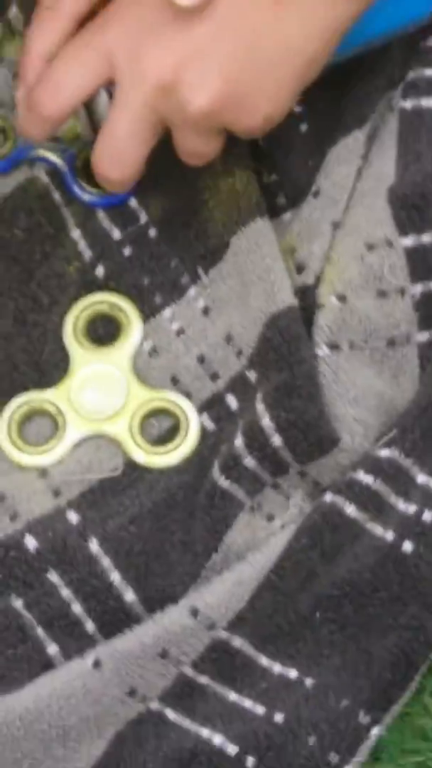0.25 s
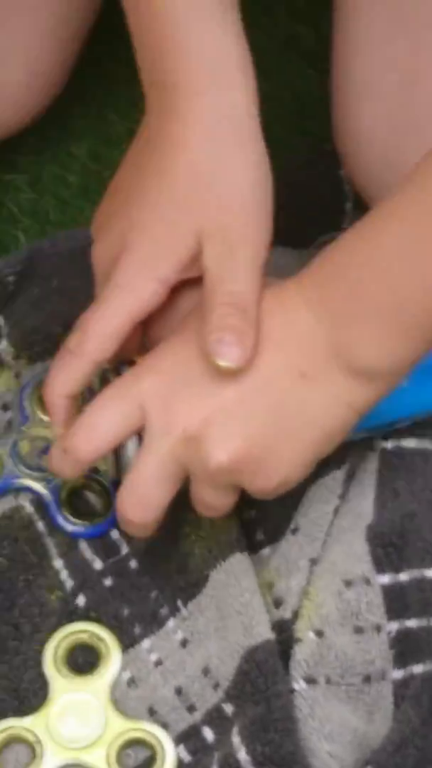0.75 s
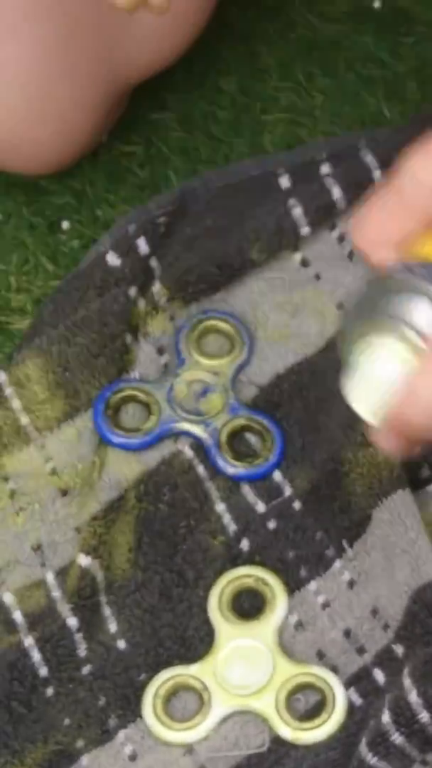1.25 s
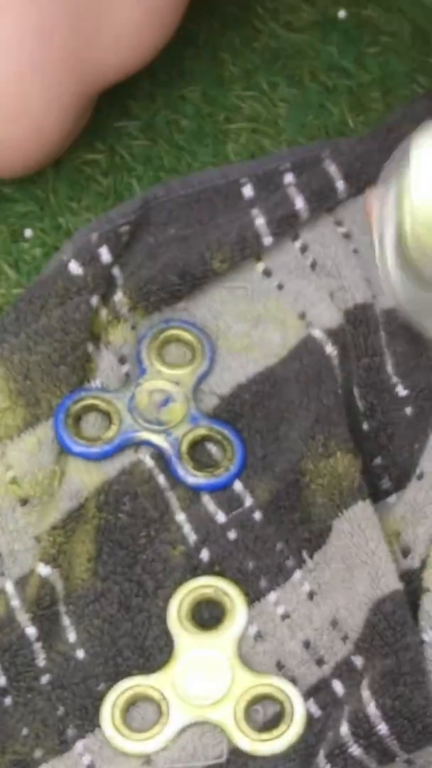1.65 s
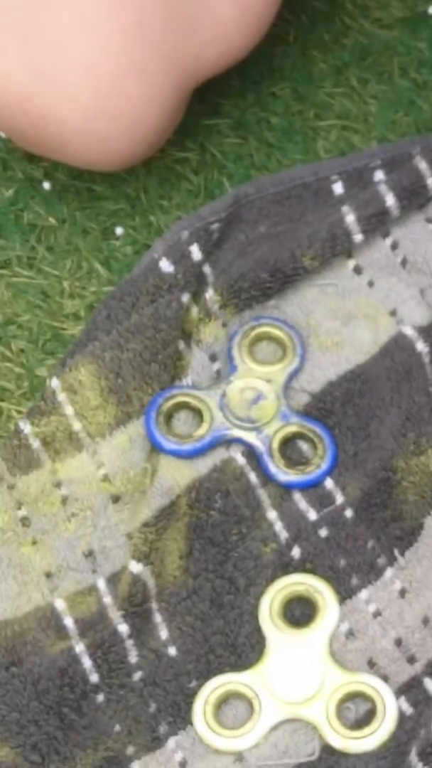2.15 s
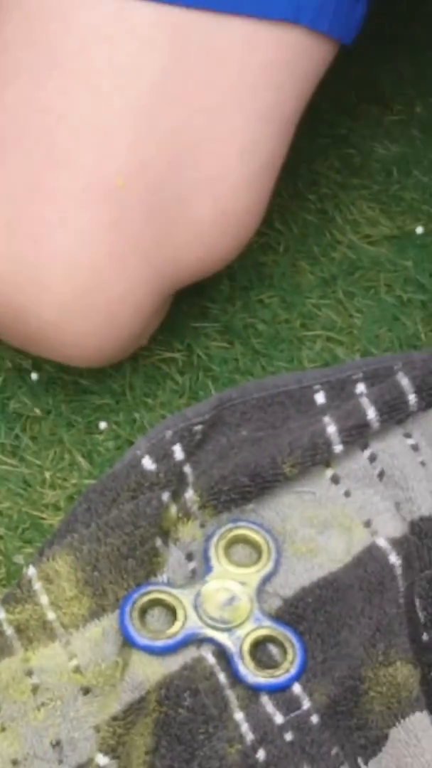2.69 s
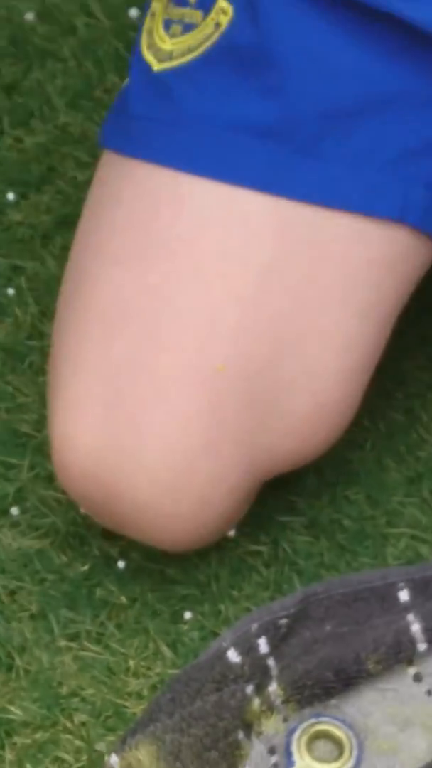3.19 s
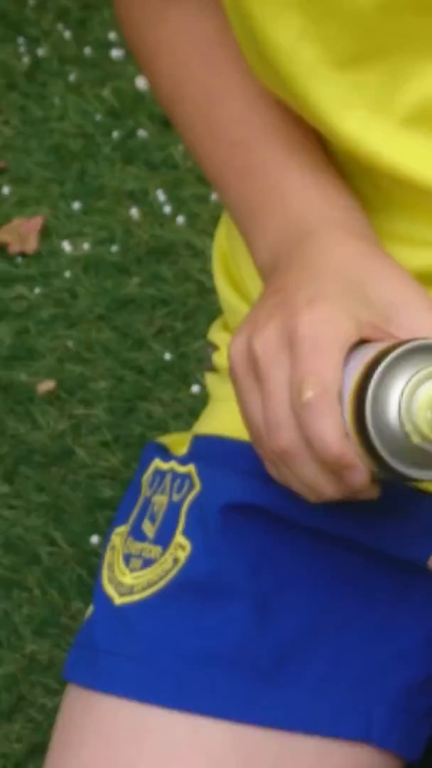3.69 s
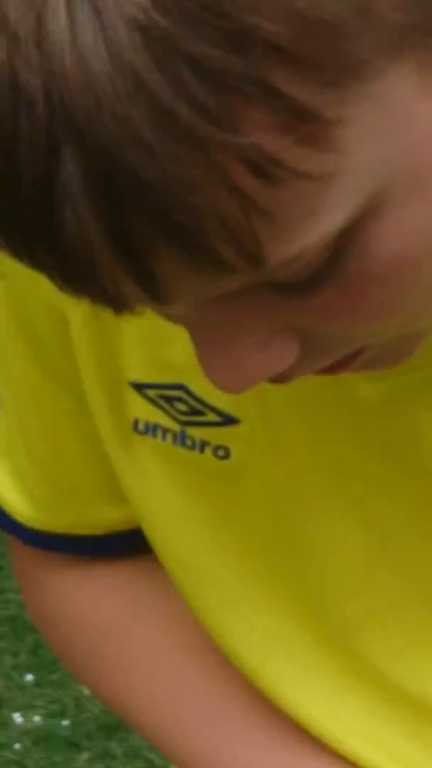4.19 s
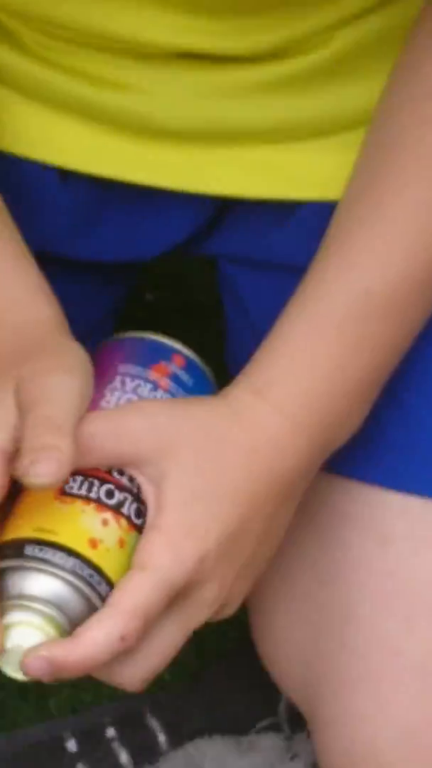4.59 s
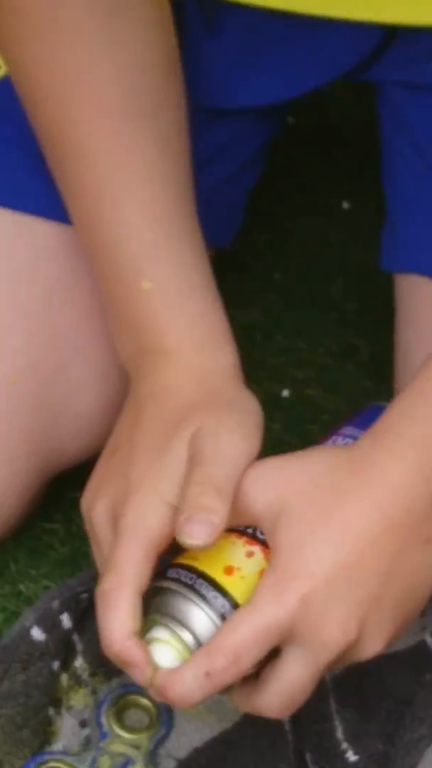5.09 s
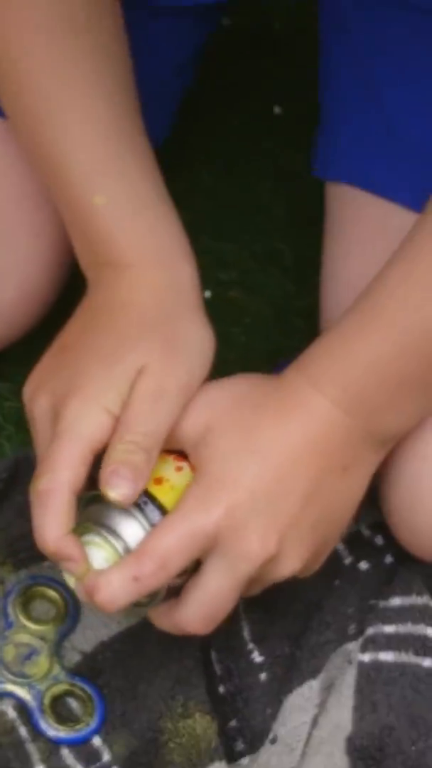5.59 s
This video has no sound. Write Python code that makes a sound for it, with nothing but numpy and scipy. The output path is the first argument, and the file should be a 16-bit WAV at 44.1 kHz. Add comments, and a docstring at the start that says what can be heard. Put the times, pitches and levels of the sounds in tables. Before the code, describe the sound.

Outdoors on a lawn, a small clink or two and faint hand rustle precede a burst of vigorous spray-can shaking. The ball makes dense, bright, irregular metal clinks with low air thumps for about two and a half seconds. Stray ticks follow, then far traffic, weak bird chirps and a very faint nozzle hiss. The close stereo handheld microphone adds slight hiss.

```python
"""Shaking a paint can

A steel paint can is shaken on a lawn: its mixing ball strikes the domed ends and the wall, bounces and rolls.
The hand-damped shell answers each blow with short clinks (fading sine waves) and a dense ring (fading noise).
Far traffic drones as wavering low tones over a noise wash, and birds chirp far off as gliding tones.
Pushed air bumps the microphone as low, filtered noise and pulses. Hands rustle on the can and at the end
the nozzle hisses faintly: both are shaped noise, as is the faint steady hiss of the microphone."""
import sys
import numpy as np
from scipy import signal
from scipy.fft import rfft, irfft, next_fast_len
from scipy.io import wavfile
from scipy.ndimage import uniform_filter1d, map_coordinates

SR = 44100
rng = np.random.default_rng(int(sys.argv[2]) if len(sys.argv) > 2 else 0)


def generate_wav(sig):
    """Save sig (samples, or channels by samples) to the path in sys.argv[1] as 16-bit PCM at SR."""
    pcm = np.round(np.clip(np.atleast_2d(sig).T, -1, 1) * 32767).astype(np.int16)
    wavfile.write(sys.argv[1], SR, pcm)


N = 257673  # length in samples


def amp(db):
    """Turn a level in dB into a gain."""
    return 10 ** (np.asarray(db) / 20)


def unit(x):
    """Scale to an average (rms) strength of 1."""
    return x / np.sqrt(np.mean(x ** 2) + 1e-20)


def peak(x):
    """Scale so the largest swing is 1."""
    return x / np.abs(x).max()


def along(points, hz):
    """Read a curve of (f/Hz, value) points on a log frequency axis."""
    f, v = np.transpose(points)
    return np.interp(np.log(hz + 1), np.log(f + 1), v)


def curves(rows):
    """Give one value per sample for each column after the time."""
    s, *cols = np.transpose(rows)
    return [np.interp(np.arange(N) / SR, s, c) for c in cols]


def during(rows, fade=0.016):
    """1 inside the time span of a table, fading to 0 outside it over `fade` seconds."""
    t = np.arange(N) / SR
    inside = np.minimum(t - rows[0][0], rows[-1][0] - t)
    return np.clip(inside / fade + 1, 0, 1)


def wobble(rate):
    """A smooth random curve with `rate` random points a second."""
    knots = rng.standard_normal(int(N * rate / SR) + 4)
    return map_coordinates(knots, [np.arange(N) * rate / SR])


def filtered(x, response):
    """Multiply the spectrum of x by a response that depends on frequency."""
    m = next_fast_len(N + SR // 2)
    hz = np.fft.rfftfreq(m, 1 / SR)
    return irfft(rfft(x, m) * response(hz), m)[..., :N]


def band(f, centre_hz, width_hz):
    """A resonance that lets its centre through at gain 1."""
    return 1j * f * width_hz / (centre_hz ** 2 - f * f + 1j * f * width_hz)


def rush(spectrum, alike, patchy_db):
    """Stereo noise of rms 1, patchy in time and pitch, with a set left-right likeness."""
    z = signal.stft(rng.standard_normal((2, N + 512)), nperseg=512)[2]
    field = rng.standard_normal(z.shape[1:])
    field = uniform_filter1d(field, size=6, axis=0)
    field = uniform_filter1d(field, size=12, axis=1)
    pair = signal.istft(z * amp(patchy_db * unit(field)), nperseg=512)[1][:, :N]

    def mid_and_side(hz):
        """Shape the noise and share it between what the sides have in common and what differs."""
        turn = np.arccos(np.clip(along(alike, hz), -1, 1)) / 2
        return amp(along(spectrum, hz)) * [np.cos(turn), np.sin(turn)]

    mid, side = filtered(pair, mid_and_side)
    return unit(np.array([mid + side, mid - side]))


# Idling engine: t/s, f/Hz before the wobble, relative level/dB, relative level of the octave/dB
IDLING = [(0.0, 50, -84, -76), (0.18, 54.3, -61, -92), (0.42, 49.9, -64, -80), (0.58, 54.9, -62, -66),
          (1.06, 55.13, -58.5, -82), (2.99, 52.8, -65.5, -65.5), (3.48, 54.16, -52.5, -76.5),
          (4.13, 57.06, -69, -72), (4.49, 57.4, -59.5, -73), (4.6, 49.8, -58, -69), (5.74, 52, -45, -59),
          (5.84, 54.5, -49.5, -61)]


def idling_engine():
    """A far engine drones as a wavering low tone and its octave."""
    hz, db, octave_db = curves(IDLING)
    turn = 2 * np.pi * np.cumsum(hz + 0.587 * wobble(10)) / SR
    low = amp(db + 1.2 * wobble(7)) * np.sin(turn)
    octave = amp(octave_db + 0.83 * wobble(4.8)) * np.sin(2 * turn)
    return np.sqrt(2) * (low + octave) * amp([[-4], [3]])  # left, right


# Strength of the road wash over time: t/s, relative level/dB
ROAD_LEVEL = [(0.0, -63.5), (1.89, -65), (5.84, -57)]
# Tone colour of the road wash: f/Hz, relative level per Hz/dB
ROAD_COLOUR = [(18, -32.5), (30, -21.5), (56, -14), (224, -27), (470, -22.5), (579, -26), (687, -23.5),
               (756, -24), (2800, -40), (3640, -83), (6160, -120)]
# How much left and right share the same wash: f/Hz, likeness [0 to 1]
ROAD_ALIKE = [(60, 0.62), (240, 0.66), (950, 0.41), (3770, 0.13), (15000, 0.16)]


def road_wash():
    """The far road is noise, strongest in the bass, whose level wavers slowly."""
    level = amp(curves(ROAD_LEVEL)[0] + 1.5 + 0.41 * wobble(5.3))
    return level * rush(ROAD_COLOUR, ROAD_ALIKE, patchy_db=1.5) * amp([[-1.5], [1.5]])


# Tone colour of the microphone's own hiss: f/Hz, relative level per Hz/dB
HISS_COLOUR = [(880, -33), (1500, -17), (2390, -27), (2970, -22.5), (3180, -16.5), (16000, -35.5)]


def mic_hiss():
    """The microphone's own faint steady hiss is soft, patchy noise."""
    return amp(-69) * rush(HISS_COLOUR, [(5000, 0.072)], patchy_db=4.5)


# Blows of the ball: t/s, relative clink level/dB, wall against ends level/dB before fixed lifts, clink centre f/Hz
BALL_BLOWS = [(0.0822, -19.5, -11, 6650), (0.1113, -39.5, 6, 6550), (0.1453, -37.5, 0, 7000),
              (0.2204, -35, -7, 6650), (1.112, -20, -1.5, 8070), (1.1472, -29, 4, 6870),
              (1.1959, -1.5, -20.5, 5810), (1.1987, -9, -36.5, 5920), (1.2172, -20.5, -24, 6300),
              (1.2367, -10.5, -27, 5900), (1.2491, -20.5, 1.5, 7150), (1.2561, -19.5, 3.5, 7370),
              (1.3212, -22.5, -4, 6725), (1.3345, -23.5, 1, 7500), (1.3943, -31, 6.5, 7400),
              (1.4345, -22, 3.5, 7950), (1.4663, -20.5, -9.5, 7540), (1.4754, -24, -6, 7160),
              (1.5033, -33.5, 0.5, 5340), (1.5292, -18.5, -13, 7430), (1.5421, -15.5, -8, 7630),
              (1.59, -14, 1.5, 7530), (1.6007, -3, -22, 7143), (1.6103, -7, -13, 6210),
              (1.6157, -5, -20.5, 7550), (1.6244, -9, -13.5, 7390), (1.6701, -9.5, -2.5, 5576),
              (1.6876, -18, -5, 7340), (1.7055, -19, -9.5, 7210), (1.7393, -26, 3.5, 6230),
              (1.7675, -4.5, -11, 7475), (1.8733, -21.5, -5, 6403), (1.8935, -16, -9, 7440),
              (1.973, -25, -11, 7160), (2.029, -36, -2.5, 7100), (2.0859, -18.5, -4, 5220),
              (2.3569, -22, 4.5, 5300), (2.3672, -20.5, -3, 5015), (2.3896, -24.5, 0, 7230),
              (2.3993, -22, -7.5, 6480), (2.443, -5, -25.5, 6216), (2.4473, -10, -26, 6460),
              (2.453, -10, -7.5, 6490), (2.4611, -10.5, -41.5, 6110), (2.5322, -5.5, -22.5, 6360),
              (2.546, -9, -20, 5910), (2.6357, -5.5, -18, 7170), (2.6455, -16, -18.5, 6500),
              (2.6559, -6.5, -21.5, 6515), (2.6659, -14.5, -20, 6500), (2.6787, -18, -26.5, 5500),
              (2.7111, -24, -1.5, 7100), (2.7295, -14, -34.5, 5940), (2.7552, -14, -34.5, 5760),
              (2.7699, -20.5, 1, 6375), (2.7803, -14, -5.5, 7350), (2.8736, -21.5, 5, 5930),
              (2.9048, -0.5, -35.5, 6480), (2.9156, -6.5, -15.5, 6290), (2.932, -10.5, -27, 5860),
              (2.9504, -12, -8.5, 5700), (2.9896, -15.5, -4, 5700), (3.0862, -33.5, 6, 5320),
              (3.1006, -19.5, 1, 5810), (3.1402, -4, -13, 5990), (3.151, -12.5, -6.5, 6150),
              (3.1829, -20, 2.5, 6100), (3.1893, -9.5, -12.5, 5930), (3.2211, -9, -18.5, 6180),
              (3.2992, -24.5, -6.5, 6150), (3.3402, -2.5, -25, 5590), (3.3609, -4, -21.5, 5670),
              (3.397, -11, -12.5, 7330), (3.4035, -6, -18, 5690), (3.4146, -9, -10, 6220),
              (3.4888, -16, -13, 6240), (3.5453, -4, -20, 6040), (3.5575, -11, -18.5, 5880),
              (3.5618, -7, -23, 5800), (3.5686, -10.5, -24, 5500), (3.5997, -20, -1.5, 6785),
              (3.616, -9.5, -31, 6060), (3.6241, -6, -25, 5840), (3.6681, -10.5, -3.5, 5650),
              (3.677, -19.5, 3.5, 6100), (3.7161, -15.5, 4.5, 6120), (3.7806, -32.5, -4, 6270),
              (3.9062, -33.5, 4.5, 6630), (4.0366, -20.5, 3.5, 5380), (4.081, -27, -7.5, 5900),
              (4.1104, -37, 10, 7120), (4.3891, -28, 1.5, 5600), (4.4351, -31, -0.5, 7220),
              (4.4583, -33.5, -2, 7640), (4.5101, -42, 0.5, 5230), (4.5636, -44, 2.5, 6640),
              (4.6156, -34.5, -5, 7400), (4.6486, -44, 3.5, 6510), (4.714, -55.5, 7, 6200),
              (5.275, -54, 10, 5770)]
# Ways the can rings, before random changes; the lowest four bend the wall, the others ring the ends:
# f/Hz, relative level/dB, time to fall by 60 dB t/s
CAN_MODES = [(1500, -9, .015), (2270, -1, .025), (2430, -1, .02), (2900, -9, .015), (3650, -16, .015),
             (4300, -14, .015), (5100, -2, .01), (5350, 0, .014), (5750, 0, .011), (6020, 0, .013),
             (6350, 0, .011), (6800, 0, .01), (7350, 0, .012), (7850, 0, .013), (8600, -6, .01),
             (9400, -8, .01), (11300, -12, .008)]
# Pitch of the wall, moving with the grip and the paint inside, before random detuning: t/s, f/Hz
WALL_PITCH = [(.1, 2364), (1.25, 2216), (1.32, 2475), (1.44, 2314), (1.75, 2400), (2.36, 2482), (2.6, 2240),
              (2.71, 2440), (2.87, 1980), (3.02, 2100), (3.14, 2400), (3.19, 1950), (3.42, 2183),
              (3.6, 2460), (3.67, 2270), (3.8, 2560), (4.44, 2603), (4.65, 2350)]
# Where the can is: t/s, left lead [samples], left minus right level/dB
CAN_PLACE = [(0, 1.4, -5), (1.1, 6.4, 0.5), (1.55, 3, -3), (2, 9.95, -3), (2.4, 15.9, 0), (3, 13.55, 1),
             (3.6, 9, -3), (4.1, 4.8, -3.5), (4.7, 1.27, -3)]
# Tone colour of the crack at contact: f/Hz, relative level per Hz/dB
CRACK_COLOUR = [(100, -65.5), (400, -30), (3000, -4), (6000, 4), (9000, -0.5), (12000, -6), (16000, -14)]


def blows(reach_hz=350, turn=1.206):
    """Each blow rings the end modes near its centre hardest; the two ports face different patches of the shell."""
    ring, crack, knock = np.zeros((3, 2, N + SR))
    t = np.arange(SR // 12) / SR
    hz, mode_db, t60 = np.transpose(CAN_MODES)[:, :, None]
    walls, usual_wall_hz = 4, 2350  # number of wall modes; wall pitch at which their table values hold
    wall = np.arange(len(CAN_MODES))[:, None] < walls
    lead, pan_db = curves(CAN_PLACE)
    for s, db, wall_db, centre_hz in BALL_BLOWS:
        wall_hz = np.interp(s, *np.transpose(WALL_PITCH))
        luck = rng.standard_normal((5, len(CAN_MODES), 1))
        noise = rng.standard_normal((2, len(t)))
        rebound = rng.random((2, 3))
        late_s = np.cumsum(0.0011 + 0.0033 * rebound[0])
        weaker_db = np.cumsum(7 + 8 * rebound[1])

        off_db = np.maximum(-4 * ((hz - centre_hz) / reach_hz) ** 2, -15)
        level = mode_db + np.where(wall, 0, off_db) + 3.0 * luck[0]
        # grip and paint detune the shell
        pitch = hz * np.where(wall, wall_hz / usual_wall_hz, 1) * (1 + 0.015 * luck[1])
        for side, sign in enumerate((1, -1)):  # left, right
            at = round(s * SR - sign * lead[round(s * SR)] / 2)
            gain = amp(db + sign * pan_db[at] / 2)
            fall = amp(level + 3.7 * luck[2 + side] - 60 * t / t60)
            tones = fall * np.sin(2 * np.pi * pitch * t + sign * turn * luck[4])
            tones = tones * (1 - np.exp(-t / 0.00026))  # soften the very first instant
            ends_part = amp(1.0) * peak(tones[walls:].sum(axis=0))
            wall_part = amp(wall_db - 1.5) * peak(tones[:walls].sum(axis=0))
            clink = gain * (ends_part + wall_part)
            ring[side, at:at + len(t)] += clink
            for late, weak in zip(late_s, weaker_db):  # the ball chatters before it leaves
                ring[side, at + int(late * SR):][:len(t)] += amp(-weak) * clink
            crack[side, at:at + len(t)] += gain * amp(-60 * t / 0.013) * noise[side]
            # a blow on the wall also knocks the whole body in the hand
            knock[side, at:at + len(t)] += gain * amp(0.72 * wall_db - 13 - 60 * t / 0.022) * noise[0]
    snap = filtered(crack[:, :N], lambda f: amp(along(CRACK_COLOUR, f) - 4))
    thud = filtered(knock[:, :N], lambda f: amp(11.0) * band(f, 900, 1350) * band(f, 600, 1600))
    return ring[:, :N], snap + thud * amp([[-3], [3]])


# Dense ring of the shell: f/Hz, time to fall by 60 dB t/s
SHELL_FADE = [(300, 0.11), (2400, 0.29), (6000, 0.16), (12000, 0.16)]


def shell(x):
    """Shell and paint ring on as noise, each band dying at its own speed; splashing paint makes it grainy."""
    out, step = np.zeros((2, N + SR)), SR // 8
    for at in range(0, N, step):  # a fresh tail for every eighth of a second
        hz, t, z = signal.stft(rng.standard_normal((2, SR // 3)), SR, nperseg=64)
        fall = amp(-60 * t / along(SHELL_FADE, hz)[:, None])
        tail = signal.istft(z * fall, SR, nperseg=64)[1]
        tail = tail / np.linalg.norm(tail[0])
        wet = signal.fftconvolve(x[:, at:at + step], tail, axes=1)
        out[:, at + 60:at + 60 + wet.shape[1]] += wet  # starts 60 samples late
    grains = amp(3.6 * wobble(250) + 1.47 * wobble(60))
    return out[:, :N] * grains


# Puff of wind on the microphone: t/s, relative level/dB
WIND_PUFF = [(0.1, -75), (0.152, -68), (0.716, -46), (1.15, -65)]


def wind():
    """A puff of air rumbles, mostly in the right port, as noise through a low resonance."""
    rumble = unit(filtered(rng.standard_normal((2, N)), lambda f: band(f, 69.4, 30) ** 2))
    return during(WIND_PUFF) * amp(curves(WIND_PUFF)[0] - 3.5) * rumble * amp([[-11], [2.5]])


# Rustle of hands on the can: t/s, level/dB
HAND_LEVEL = [(.3, -81), (.45, -72), (.7, -74), (.85, -64.5), (.95, -83), (1.08, -57.5)]
# Tone colour of the rustle: f/Hz, relative level per Hz/dB
HAND_COLOUR = [(2650, -27), (4500, -3), (6320, -14), (7410, 6.5), (9020, -38), (10200, -11), (16000, -38.5)]


def hands():
    """Hands rustle on the can: bright noise with strong random patches."""
    noise = rush(HAND_COLOUR, [(5000, 0.18)], patchy_db=6.0)
    return during(HAND_LEVEL) * amp(curves(HAND_LEVEL)[0]) * noise


# Air pushed at the microphone, first by the breeze, then by the shaking hand: t/s, relative pulse level/dB
AIR_PUSHES = [(0.56, -17), (0.647, -22), (0.738, -30), (0.849, -24), (1.196, -3.5), (1.603, -10),
              (1.766, 2), (2.442, 1.5), (2.635, -2), (2.904, -4.5), (3.545, -4), (3.714, -3)]


def air_thumps():
    """Each single push of air is one pulse through two low resonances, heard as a thump."""
    pushes = np.zeros(N)
    for s, db in AIR_PUSHES:
        pushes[round(s * SR)] = amp(db)
    thumps = filtered(pushes, lambda f: band(f, 83, 138) * band(f, 140, 235))
    return thumps * amp([[-4], [3]])


# Far birds: start t/s, length t/s, first f/Hz, last f/Hz, relative level/dB
BIRD_CHIRPS = [(0.814, 0.088, 4230, 3940, -75), (0.88, 0.087, 3370, 3020, -76.5),
               (0.948, 0.1, 4000, 4270, -77), (1.008, 0.072, 2570, 2430, -72.5),
               (4.75, 0.11, 4400, 3600, -72.5), (5.105, 0.047, 4550, 4300, -78.5),
               (5.134, 0.0624, 3760, 3600, -72.5), (5.399, 0.08, 4140, 3960, -75),
               (5.555, 0.064, 4000, 4660, -71)]


def birds(smear_hz=600):
    """Gliding chirps, smeared by distance into narrow noise."""
    out = np.zeros((2, N + SR))
    for s, length, from_hz, to_hz, db in BIRD_CHIRPS:
        n = round(length * SR)
        start = round(s * SR)
        turn = 2 * np.pi * np.cumsum(np.linspace(from_hz, to_hz, n)) / SR
        knots = rng.standard_normal((2, 80))
        smear = [np.interp(np.arange(n) * smear_hz * 2 / SR, np.arange(80), k) for k in knots]
        swell = np.sqrt(np.hanning(n))
        out[:, start:start + n] += amp(db + 16) * swell * smear * np.sin(turn)
    return out[:, :N]


# How busily the ball rolls: t/s, level at the ends/dB
ROLL_LEVEL = [(1.08, -79), (1.32, -44.5), (1.89, -43), (2.09, -60.5), (2.39, -64), (2.56, -58),
              (2.94, -69.5), (3.43, -49.5), (3.56, -38), (3.76, -43), (4.15, -68.5), (4.54, -68.5),
              (4.8, -76)]


def rolling(per_second=2500):
    """The ball skitters over the steel and the paint sloshes: dense soft ticks ring the ends and wall."""
    ends_db, = curves(ROLL_LEVEL)
    wall_db = -52.5 + 0.48 * (ends_db + 51)  # the wall follows about half the swing of the ends

    def ticks():
        """Random pulses of random strength, on average per_second of them on each side."""
        hit = rng.random((2, N)) < per_second / SR
        return hit * amp(3.5 * wobble(150)) * rng.standard_normal((2, N))

    ends = unit(filtered(
        ticks(), lambda f: band(f, 5900, 1100) + 0.57 * band(f, 7330, 900) + 0.1 * band(f, 8700, 5000)))
    wall = unit(filtered(ticks(), lambda f: band(f, 2390, 460) + 0.23 * band(f, 1200, 2400)))
    return during(ROLL_LEVEL) * (amp(ends_db) * ends + amp(wall_db) * wall)


# Engine that speeds up: t/s, f/Hz, relative level/dB
SPEEDING = [(4.1, 60.5, -82), (4.588, 68.4, -57), (5.84, 81.3, -60.5)]


def speeding_engine():
    """A second far engine speeds up: a low tone climbs while its level wavers."""
    hz, db = curves(SPEEDING)
    tone = np.sin(2 * np.pi * np.cumsum(hz) / SR)
    climb = during(SPEEDING) * amp(db + 3.3 * wobble(6)) * tone
    return np.sqrt(2) * climb * amp([[-4], [3]])


# The nozzle opens: t/s, level of the spurt before it sags/dB
NOZZLE_PRESSES = [(5.15, -64), (5.41, -68)]
# Tone colour of the nozzle: f/Hz, relative level per Hz/dB
NOZZLE_COLOUR = [(1470, -39), (2500, -17), (3440, -12.5), (4210, -6.5), (6350, -11.5), (7020, -15),
                 (11700, -12), (15000, -31.5), (16000, -41)]


def nozzle():
    """The nozzle lets out a thin noise that spurts at each press and leaks steadily after the first."""
    rise_s, sag_db_per_s, leak_db = 0.0119, 49.5, -72
    presses = np.array(NOZZLE_PRESSES)
    since = np.arange(N) / SR - presses[:, :1]
    opened = np.clip(since / rise_s, 0, 1)
    spurts = opened * amp(presses[:, 1:] - sag_db_per_s * np.maximum(since, 0))
    level = spurts.sum(axis=0) + amp(leak_db) * opened[0]
    return level * rush(NOZZLE_COLOUR, [(5000, 0.16)], patchy_db=1.9)


def scene():
    """Add up the can, the hands, the moving air, the street, the birds and the microphone hiss."""
    street = idling_engine() + road_wash() + speeding_engine()
    clinks, cracks = blows()
    ring = shell(amp(-7) * clinks + amp(-3.0) * cracks)
    can = clinks + cracks + ring + rolling() + nozzle()
    return street + mic_hiss() + can + wind() + hands() + air_thumps() + birds()


def record(dry):
    """The loudest peaks round off; the microphone drops the deepest bass; the sound holds nothing above top_hz."""
    top_hz, bass_hz = 15850, 42
    soft = dry / (1 + np.abs(dry / 0.95) ** 6) ** (1 / 6)
    return filtered(soft, lambda hz: (hz < top_hz) / (1 + (bass_hz / (hz + 1)) ** 8))


dry = scene()
out = record(dry)
generate_wav(out)
```